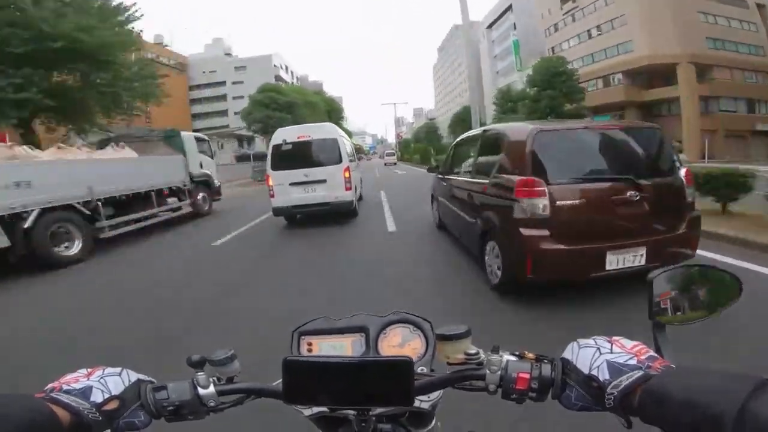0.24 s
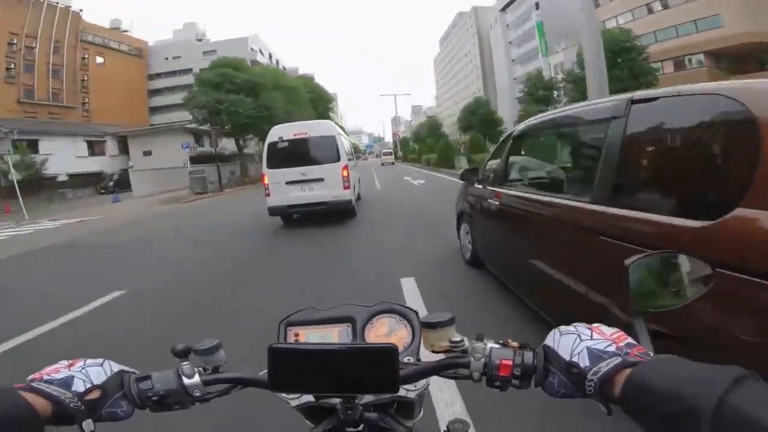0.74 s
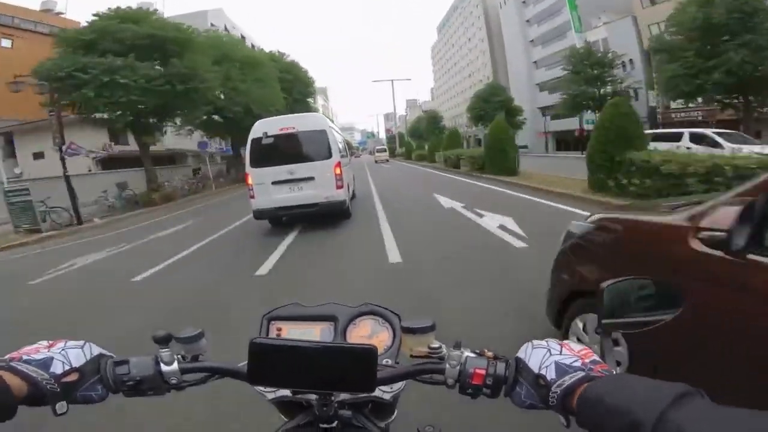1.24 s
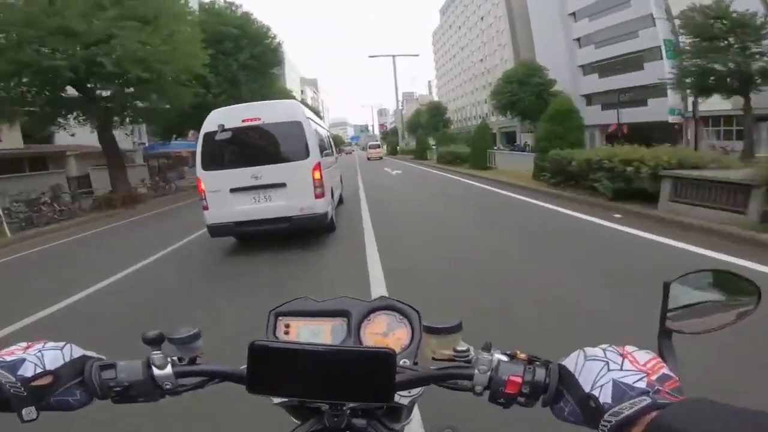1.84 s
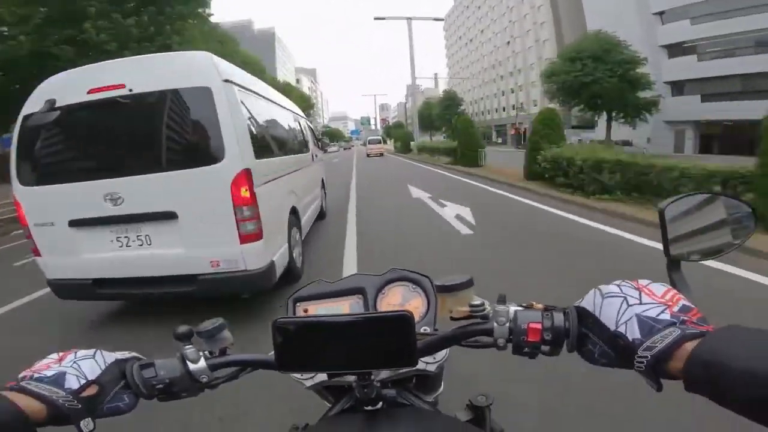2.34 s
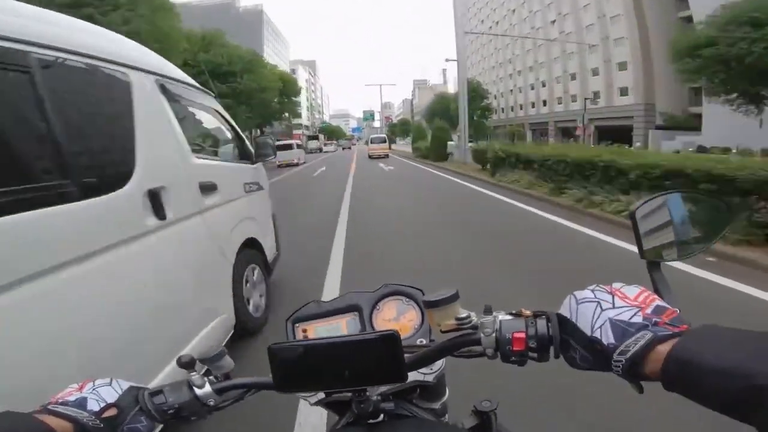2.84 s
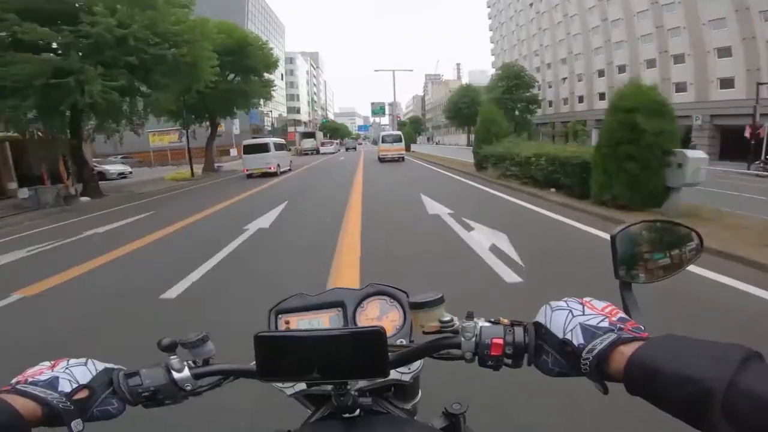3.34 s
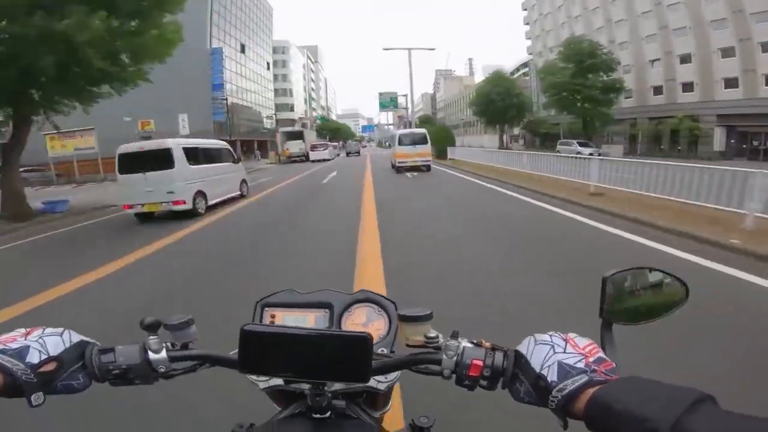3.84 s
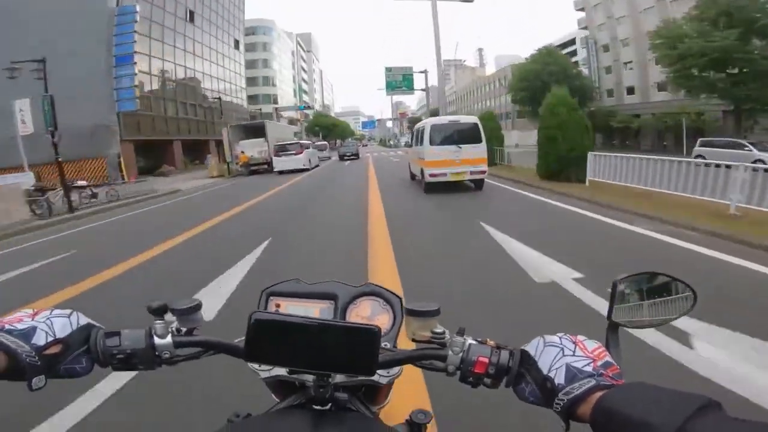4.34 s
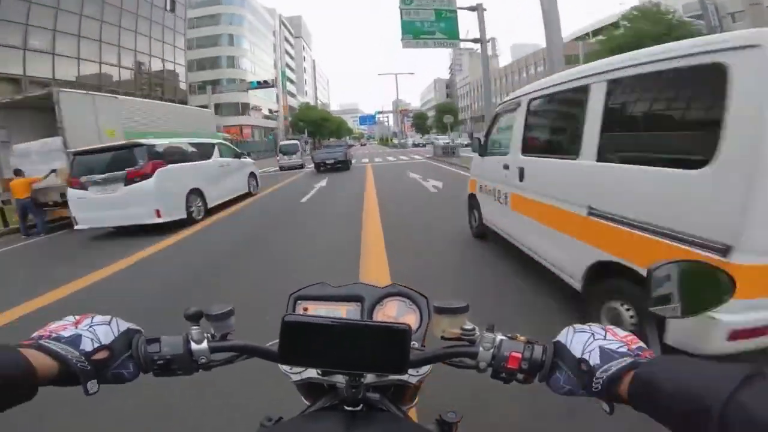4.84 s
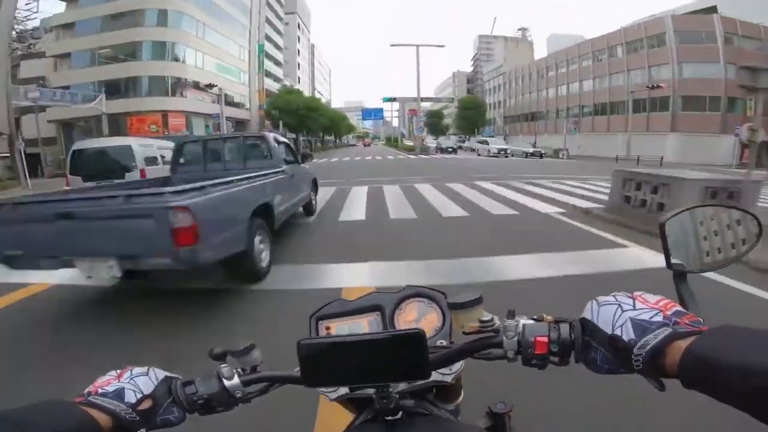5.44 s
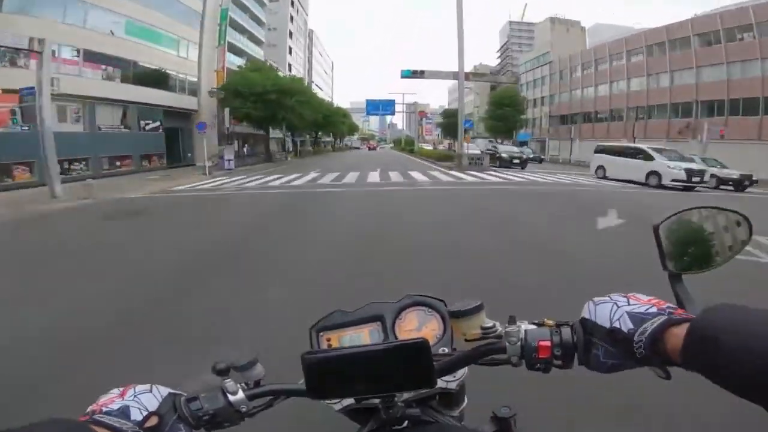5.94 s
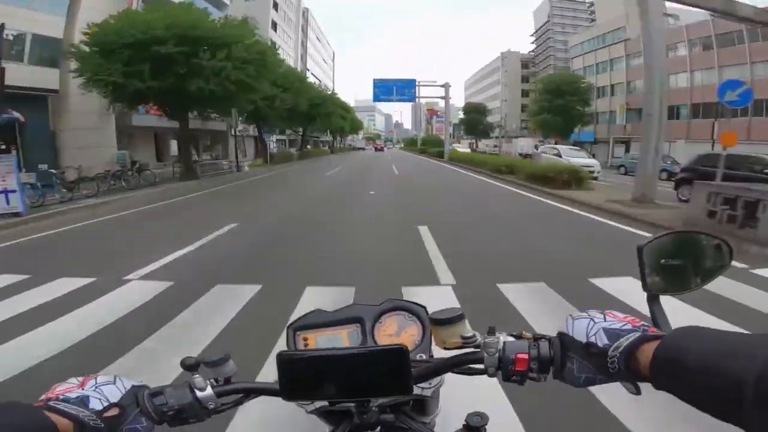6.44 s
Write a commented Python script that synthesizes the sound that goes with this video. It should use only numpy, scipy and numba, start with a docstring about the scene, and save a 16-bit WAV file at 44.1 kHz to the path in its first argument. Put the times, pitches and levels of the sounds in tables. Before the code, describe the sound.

An on-board stereo microphone on a motorcyclist riding through city traffic. At 0 s the V-twin is throttled down, rough and muted, then settles into a low uneven purr while strong wind gusts thud, click and crackle on the right until about 1 s. Wind eases somewhat around 1.3-2.7 s. From 1.8 s the engine pulls, its deep exhaust and hard bark rising until 2.65 s, when the throttle snaps shut for an upshift and the pitch drops. Around 2.8-3.2 s a bright rush of hiss and ringing exhaust reflects off a passed van; gusts overload near 3.3 s. A second loaded pull climbs from about 3.8 to 4.85 s, followed by another quick shift and a heavy wind slap. The engine drones steadily, backs off from 5.7 s with pops and sputters, briefly opens near 6.4 s and eases again, amid buffeting wind.

```python
"""A V-twin motorcycle rides through town and changes up twice, heard from two microphone ports on the rider.
Two uneven firings a cycle ring the exhaust: a deep body, a bark above it and blurred gas noise.
Engine and road hiss lie over it as filtered noise, swelling mostly beside vehicles overtaken.
Wind buffets each port on its own as low resonant noise, hardest on the right, where it overloads the
recorder with clicks and crackle."""
import sys
import numpy as np
from scipy import signal
from scipy.fft import rfft, irfft
from scipy.io import wavfile
from scipy.ndimage import uniform_filter1d
from numba import njit

SR = 44100
rng = np.random.default_rng(int(sys.argv[2]) if len(sys.argv) > 2 else 0)


def waveform_to_disk(signal):
    """Save audio, clipped to [-1, 1], as 16-bit WAV at the path in sys.argv[1]."""
    frames = np.transpose(np.atleast_2d(signal))
    scaled = np.clip(frames, -1, 1) * 32767
    samples = np.round(scaled).astype(np.int16)
    wavfile.write(sys.argv[1], SR, samples)


N = 294147


def undb(db):
    """Gain of a level in dB."""
    return 10 ** (np.asarray(db) / 20)


def unit(x):
    """Scaled to rms 1."""
    return x / np.sqrt(np.mean(x ** 2))


def curves(table):
    """Columns of a table joined by straight lines in time."""
    s, *columns = np.transpose(table)
    return [np.interp(np.arange(N) / SR, s, column) for column in columns]


def spell(start, end, rise, fall):
    """0 to 1 and back: full from start to end, straight ramps outside."""
    t = np.arange(N) / SR
    return np.clip(np.minimum(1 + (t - start) / rise, 1 + (end - t) / fall), 0, 1)


def late(x, s):
    """Delayed by s seconds; a negative s moves it ahead."""
    return np.interp(np.arange(N) - s * SR, np.arange(N), x, left=0)


def sides(pan_db):
    """Gains of the left and right port; pan_db is left minus right."""
    return undb(np.array([[pan_db], [-pan_db]]) / 2)


def walk(rate):
    """Random levels held 1 / rate s and slewed twice; spread near 1."""
    hold = int(SR / rate)
    levels = np.repeat(rng.standard_normal(N // hold + 1), hold)
    return 1.33 * uniform_filter1d(uniform_filter1d(levels, hold), hold)[:N]


@njit
def svf(x, hz, width):
    """State-variable band-pass with a moving centre, gain 1 at the centre."""
    y, band, low = np.empty(len(x)), 0., 0.
    for i in range(len(x)):
        g, k = np.tan(np.pi * hz[i] / SR), width / hz[i]
        v = (band + g * (x[i] - low)) / (1 + g * (g + k))
        band, low, y[i] = 2 * v - band, low + 2 * g * v, k * v
    return y


def ring(x, modes, count=2, stretch=0.97):
    """Resonances in parallel at stretched centres, rms 1; applied twice they leave dark valleys."""
    out = 0
    for hz, width, db in modes:
        y = x
        for _ in range(count):
            y = svf(y, hz * stretch * np.ones(N), width * np.mean(stretch) * np.sqrt(count))
        out = out + undb(db) * y
    return unit(out)


def causal(x, spectrum, size=8192):
    """Filter with the given (Hz, dB) spectrum and the earliest possible response, from the folded cepstrum."""
    hz, db = np.transpose(spectrum)
    grid = np.maximum(np.arange(size // 2 + 1) * SR / size, 1)
    cepstrum = irfft(np.log(undb(np.interp(np.log(grid), np.log(hz), db))))
    cepstrum[1:size // 2] *= 2
    cepstrum[size // 2 + 1:] = 0
    response = irfft(np.exp(rfft(cepstrum)))[:size // 2]
    return signal.fftconvolve(x, response)[:N]


# Steady stream of air over the ports between gusts.
# Each row: time in seconds, left port level in dB, right port level in dB.
STEADY_WIND = [(0, -23, -11.5), (.3, -20, -16), (1.1, -23, -12.5), (1.5, -23.5, -18), (2.2, -21, -21.5),
               (2.55, -19, -24.5), (2.85, -23, -6), (3.3, -14, -13), (3.5, -25.5, -15), (3.8, -21.5, -10),
               (4.1, -18.5, -10.5), (4.9, -18, -7), (5.6, -17.5, -11), (6.1, -10.5, -7), (6.4, -20, -9.5),
               (6.67, -9.5, -21)]
# Gusts that hit the ports. Each row: time of the peak in seconds, left peak in dB, right peak in dB.
WIND_GUSTS = [(0.058, -21.5, -6), (0.272, -13.5, -7), (.41, -9.5, 3), (0.633, -10, -1.5),
              (0.741, -21, -25.5), (0.858, -13, 0.5), (.96, -14, -6), (1.05, -15, -8.5),
              (1.142, -13.5, -7.5), (1.22, -16.5, -9), (1.28, -19, -17), (1.424, -16.5, -13.5),
              (1.65, -27.5, -14.5), (1.929, -13.5, -22.5), (2.28, -18.5, -15.5), (2.841, -12.5, -7),
              (3.04, -6.5, 3), (3.268, -11, -1), (3.331, -7, 4.5), (3.549, -12, -7), (3.721, -13, -7),
              (3.91, -10.5, -3.5), (4.128, -17, -13), (4.292, -20, -5.5), (4.459, -11.5, -4.5),
              (4.699, -32, -14), (4.761, -19, -23), (4.948, -2.5, 2.5), (5.259, -9, -3), (5.461, -8, 2),
              (5.711, -9.5, 0), (5.858, -5.5, 2), (6.02, -16.5, -6), (6.289, -4, 3.5), (6.557, -8.5, -14)]
GUST_RISE_DB_S, GUST_FALL_DB_S = 171.5, 170


def gusting():
    """Wind level in dB at each port: gusts climb out of the steady stream and die back."""
    t = np.arange(N) / SR
    power = undb(curves(STEADY_WIND)) ** 2
    for s, *peak_db in WIND_GUSTS:
        away_db = np.where(t < s, GUST_RISE_DB_S * (s - t), GUST_FALL_DB_S * (t - s))
        power = power + (undb(peak_db)[:, None] * undb(-away_db)) ** 2
    return 10 * np.log10(power)


# Single hard eddies on the right port.
# Each row: centre in seconds, swing in dB before its fade, pitch in Hz.
WIND_SLAPS = [(0.351, 5, 91), (0.645, 4.5, 91), (0.781, -0.5, 84), (0.844, 6, 104), (.882, 1.5, 86.4),
              (3.315, 7, 104), (3.938, -4, 95), (4.931, 12, 93), (5.853, 8.5, 84), (5.897, 11.5, 102),
              (6.046, 10.5, 89), (6.247, 4.5, 74.6), (6.299, 4, 93.5), (6.372, 7, 94)]


def slaps():
    """A swing or two of pressure, steepest at the given moment."""
    out, t = np.zeros(N), np.arange(-1300, 1300) / SR
    for s, db, hz in WIND_SLAPS:
        start = int(s * SR) - len(t) // 2
        fade = np.exp(-(t * hz / 0.59) ** 2)
        out[start:start + len(t)] += undb(db) * np.sin(2 * np.pi * hz * t) * fade
    return out


# Clicks of the right channel overloading in the wind.
# Each row: start in seconds, level of the first click in dB before filtering.
OVERLOAD_CLICKS = [(0.347, -19), (.381, -23), (.4, -19), (0.427, -25), (.443, -25), (.478, -21),
                   (.596, -24), (.621, -21.5), (.646, -25), (.683, -27), (0.782, -24), (0.836, -20.5),
                   (.876, -17), (.935, -22), (3.278, -14), (3.313, -1), (3.421, -17), (3.635, -22),
                   (3.733, -26), (3.863, -21), (3.936, -16), (5.159, -26), (5.228, -16), (5.335, -16),
                   (5.83, -13)]
# Falling spectrum of a click. Each row: frequency in Hz, gain in dB.
CLICK_SPECTRUM = [(200, 10), (650, 28), (1200, 20), (2500, 6), (6000, -14), (12000, -40)]
CLUSTER_CLICKS, CLICK_GAP_S, CLICK_FADE_DB = 4, .005, 4  # clicks in a cluster, mean gap, mean loss per click
# overload crackle in the hardest gusts: highest rate, wind level of half that rate, size before filtering
CRACKLE_PER_S, CRACKLE_FROM_DB, CRACKLE_DB = 100, 1, -27


def overload_clicks(wind_db):
    """Clusters of overload clicks, either way; random crackle stands in for more in the hardest gusts."""
    s, db = np.transpose(OVERLOAD_CLICKS)
    gap, size = rng.random((len(OVERLOAD_CLICKS), 2, CLUSTER_CLICKS)).transpose(1, 0, 2)
    click = np.arange(CLUSTER_CLICKS)
    at = s[:, None] + CLICK_GAP_S * np.cumsum((.5 + gap) * (click > 0), axis=1)
    gain = undb(db[:, None] - 2 * CLICK_FADE_DB * click * size) * (-1.) ** click
    clusters = np.bincount((at.ravel() * SR).astype(int), gain.ravel(), N)
    chance = CRACKLE_PER_S / SR / (1 + undb(2 * (CRACKLE_FROM_DB - wind_db)) ** 2)
    crackling = rng.random(N) < chance
    crackle = undb(CRACKLE_DB) * crackling * rng.standard_normal(N)
    return causal(clusters + crackle, CLICK_SPECTRUM)


WIND_FLOOR_HZ, WIND_TOP_HZ = 17, 530


def wind():
    """Eddies thud on each port: a broad low resonance over a deep heave, with a tail into the low mids."""
    floor = signal.butter(2, WIND_FLOOR_HZ, "high", fs=SR, output="sos")
    top = signal.butter(3, WIND_TOP_HZ, fs=SR, output="sos")
    edges = np.vstack((floor, top))
    left_db, right_db = gusting()
    out = []
    for db, heave_db, flutter_db in ((left_db, -4.5, -10), (right_db, -2.2, -19)):
        gust = undb(4.3 * walk(15))
        hz = 60.5 + 0.71 * (db + 5.0)  # faster air sheds quicker eddies
        thud = unit(svf(svf(gust * rng.standard_normal(N), hz, 43.0), hz, 110.))
        heave = ring(gust * rng.standard_normal(N), [(35.4, 23.7, 0)])
        flutter = ring(gust * rng.standard_normal(N), [(111.0, 160, -3.0), (281.0, 89.0, -6.0)])
        rumble = thud + undb(heave_db) * heave + undb(flutter_db) * flutter
        out.append(undb(db) * signal.sosfilt(edges, rumble))
    left, right = out
    return np.array([left, right + slaps() + overload_clicks(right_db)])


# The hiss swells, mostly beside vehicles overtaken. Each row: start of the full swell in seconds,
# its end in seconds, rise before it in seconds, rasp gain in dB, air gain in dB.
HISS_SWELLS = [(0.442, 0.896, 0.12, 0.5, 2.5), (2.284, 2.33, 0.28, 2.5, 1.5),
               (2.759, 3.21, 0.06, 9.5, 15.5), (4.388, 4.444, 0.16, 2, 4), (4.982, 5.246, 0.13, 3.5, 6),
               (5.608, 5.72, 0.051, 3.5, 9), (5.86, 5.882, 0.038, -2.5, -3.5), (6.32, 6.33, 0.12, 2, 0.5)]
SWELL_FALL_S = 0.31


def swells():
    """Gain of rasp and of air in dB."""
    shape = np.array([spell(start, end, rise, SWELL_FALL_S) for start, end, rise, _, _ in HISS_SWELLS])
    return np.transpose(HISS_SWELLS)[3:] @ shape


# Spectrum of the rasp from engine and road. Each row: frequency in Hz, level in dB.
RASP_SPECTRUM = [(200, -11), (400, 11.5), (850, 9.5), (1100, 3), (1350, -3), (1900, -6.5), (2350, -13),
                 (2750, -7), (3300, -16), (3800, -18), (4300, -20.5), (5500, -29), (9000, -60.5)]
# Spectrum of the airy hiss above it. Each row: frequency in Hz, level in dB.
AIR_SPECTRUM = [(1500, -34), (3500, 3.5), (5000, 2.5), (6000, 1.5), (7000, -5.5), (8500, -10), (10000, -14),
                (12000, -20.5), (15000, -31)]
# Valve gear rings the engine case. Each row: centre in Hz before the stretch in ring(), width in Hz
# before the same stretch, level in dB.
CLATTER_MODES = [(2722, 160, -0.5), (3350, 500, -4.5), (2038, 90, 2.5)]
CLATTER_DB, CLATTER_S = -20, 0.013  # under the rasp; decay after each firing
AIR_PAN_DB = -1  # left minus right


def hiss(since, rasp_db, air_db):
    """Rasp and clatter that jump at each firing and air above it, flickering, partly shared by the ports."""
    jump = 1 + .9 * np.exp(-since / .006)
    clatter_jump = 0.95 + np.exp(-since / CLATTER_S)
    shared, left, right, case = rng.standard_normal((4, N))
    flicker_db = 1.0 * walk(25)
    out = []
    for own, pan_db in ((left, AIR_PAN_DB / 2), (right, -AIR_PAN_DB / 2)):
        noise = .65 * shared + own
        rasp = undb(rasp_db) * unit(causal(jump * noise, RASP_SPECTRUM))
        case_noise = 0.53 * case + rng.standard_normal(N)
        clatter = undb(rasp_db + CLATTER_DB) * ring(clatter_jump * case_noise, CLATTER_MODES)
        air = undb(air_db + pan_db) * unit(causal(noise, AIR_SPECTRUM))
        out.append(undb(flicker_db) * (rasp + clatter + air))
    return np.array(out)


BARK_AHEAD_S = .0012  # bark pulses moved ahead, since the doubled resonance rises slowly

# Firings ring between bike and vehicle. Each row: centre in Hz before the stretch in ring(), width in Hz
# before the same stretch, level in dB.
FLANK_MODES = [(655, 80, 2.5), (887, 12, 2)]
FLANK_DB, FLANK_GAIN = -56, 2.9  # with no swell and no exhaust drop; dB per dB of rasp swell
FLANK_FIRST_DB, FLANK_ECHO_S, FLANK_ECHO_DB = -18, .0066, -9  # first firing beside the second; one echo


def flank(pulses, rasp_swell_db, drop_db):
    """Vehicle flanks throw the firings back, mainly the second, as a ring with one echo."""
    beside = late(undb(FLANK_FIRST_DB) * pulses[0] + pulses[1], -BARK_AHEAD_S)
    echoed = beside + undb(FLANK_ECHO_DB) * late(beside, FLANK_ECHO_S)
    return undb(FLANK_DB + FLANK_GAIN * rasp_swell_db - drop_db) * ring(echoed, FLANK_MODES)


# The engine through two pulls in a gear, each ended by a change up.
# Each row: time in seconds, engine cycle rate in Hz, load from 0 to 1.
ENGINE_RUN = [(0.0, 39.15, 0.2), (0.24, 39.2, 0), (0.32, 40.72, 0.1), (0.42, 39.3, 0.01), (.85, 39.65, .1),
              (1.25, 40.5, .25), (1.42, 40.7, 0.3), (1.74, 41.07, 0.2), (1.81, 41.52, 0.7),
              (2.05, 43.9, 0.8), (2.2, 45.7, .85), (2.35, 47.2, 0.9), (2.5, 48.75, .95), (2.62, 49.7, 0.97),
              (2.75, 38.1, 0), (2.8, 40.2, .25), (3.05, 41.4, 0.4), (3.35, 42.08, 0.2), (3.6, 41.68, .35),
              (3.78, 42.43, 0.6), (4.0, 43.35, 1), (4.25, 44.8, .97), (4.5, 46.3, .94), (4.82, 47.8, 0.9),
              (4.94, 38.1, 0.1), (4.99, 40.0, 0.4), (5.16, 40.7, 0.3), (5.66, 40.5, 0.6), (5.92, 39.08, .4),
              (6.25, 39.44, .4), (6.36, 40.3, 0.4), (6.45, 43.1, 0.2), (6.67, 44.47, .3)]


def engine_run():
    """Engine cycle rate in Hz and load, moving in straight lines."""
    return curves(ENGINE_RUN)


# Throttle shut or feathered. Each row: start in seconds, end in seconds, exhaust drop in dB,
# unevenness of the burn from 0 to 1.
THROTTLE_SHUT = [(-.1, 0.209, 10, 0.5), (2.649, 2.733, 8.5, 0.1), (4.847, 4.933, 12.5, 0),
                 (5.068, 5.657, 0.15, 0.09), (5.705, 5.922, 10.5, 0.4), (5.916, 6.205, 8.5, 0.1),
                 (6.183, 6.365, 10, 0.4), (6.364, 6.465, 0.5, .25), (6.494, 6.8, 8.5, 0.3)]
# The exhaust catches for a moment. Each row: start in seconds, rise in dB.
EXHAUST_CATCHES = [(.045, 6), (0.117, 0.5), (4.99, 3.5), (5.772, 6), (5.838, 13.5), (6.309, 5), (6.43, 2.5),
                   (6.6, 4)]
CLOSE_S, OPEN_S = 0.032, 0.056  # the throttle snaps shut and rolls open
CATCH_S, STEADY_BURN = .018, .05  # length of a catch and of each ramp; least unevenness


def throttle():
    """Drop of the exhaust level in dB and unevenness of the burn."""
    shut = np.array([spell(start, end, CLOSE_S, OPEN_S) for start, end, _, _ in THROTTLE_SHUT])
    shut = shut / np.maximum(shut.sum(axis=0), 1)  # overlapping spells share the throttle
    drop_db, rough = np.transpose(THROTTLE_SHUT)[2:] @ shut
    for s, db in EXHAUST_CATCHES:
        drop_db = drop_db - db * spell(s, s + CATCH_S, CATCH_S, CATCH_S)
    return drop_db, np.maximum(rough, STEADY_BURN)


# Uneven spacing of the twin, the second firing drifting later through each pull.
# Each row: time in seconds, place of the second firing as a share of the cycle.
SECOND_FIRING_PLACE = [(0, 0.4), (1.7, 0.38), (1.85, 0.37), (2.6, 0.41), (2.68, 0.38), (2.8, 0.39),
                       (3.3, 0.39), (3.5, 0.37), (3.9, 0.389), (4.8, 0.41), (4.88, 0.37), (5.7, 0.39),
                       (6.67, 0.37)]
FIRST_TURN = .463  # cycles before the first firing


def firings(hz, rough):
    """Two pulses a cycle, scattered by a rough burn; one train per cylinder, and seconds since the last."""
    cycles = np.cumsum(hz) / SR - FIRST_TURN
    turns = np.arange(int(cycles[-1]))
    gap = np.interp(turns, cycles, curves(SECOND_FIRING_PLACE)[0])
    place = np.interp(np.sort(np.r_[turns, turns + gap]), cycles, np.arange(N))
    chance = rng.standard_normal((len(place), 2))
    scatter = np.interp(place, np.arange(N), rough)
    place = np.clip(place + scatter * chance[:, 0] * .0012 * SR, 0, N - 2)
    size = undb(8 * scatter * chance[:, 1])
    # each pulse is split over the two samples around its place
    whole = place.astype(int)
    share = place - whole
    early_part, late_part = size * (1 - share), size * share
    pulses = np.array([np.bincount(whole[k::2], early_part[k::2], N) +
                       np.bincount(whole[k::2] + 1, late_part[k::2], N) for k in range(2)])
    fired = pulses.sum(axis=0) > 0
    since = np.arange(N) - np.maximum.accumulate(np.where(fired, np.arange(N), 0))
    return -pulses, since / SR


EXHAUST_DB = -16.5  # level of the body with the throttle open

# The note left with the throttle shut.
# Each row: centre as a multiple of the cycle rate, width in multiples of the mean rate, level in dB.
OVERRUN_MODES = [(8, .8, 0)]
OVERRUN_DB, OVERRUN_FULL_DB = -13, 7  # under the open body; exhaust drop at which it sounds in full


def overrun(pulses, drop_db, hz):
    """A narrow resonance follows a multiple of the cycle rate while the exhaust is down."""
    depth = np.clip(drop_db / OVERRUN_FULL_DB, 0, 1)
    return undb(EXHAUST_DB + OVERRUN_DB) * depth * ring(pulses.sum(axis=0), OVERRUN_MODES, stretch=hz)


# Spectra of one exhaust pulse at light and at full load. Each row: frequency in Hz, level in dB.
LIGHT_PULSE = [(30, -28.5), (90, -6.5), (160, -28.5), (203, -2.5), (240, 0.5), (290, -6), (330, -3),
               (400, 4.5), (450, 2), (490, -12.5), (530, -11), (580, -26), (800, -44), (2500, -120)]
LOADED_PULSE = [(30, -23), (90, 1.5), (140, -2.5), (185, -5), (232, 2.5), (280, -5), (320, -5), (370, -2.5),
                (455, 4.5), (505, -4), (550, -14.5), (600, -23.5), (800, -25), (2500, -120)]
# Upper pipe resonances; they climb with the revs as the gas heats.
# Each row: centre in Hz at a cycle rate of BARK_AT_HZ, width in Hz at that rate, level in dB.
BARK_MODES = [(667, 80, 12), (736.4, 65.6, 16), (795, 41, 7)]
BARK_AT_HZ, BARK_CLIMB = 43.3, .3  # cycle rate; power of the rev ratio that they follow
BARK_LIGHT_DB, BARK_LOAD_DB = -21.5, 8  # over the body at no load; added at full load
BARK_KEEP, BARK_BESIDE = .3, 0.67  # share of an exhaust drop escaped; dB per dB of rasp swell off flanks
# under load the second firing barks harder, less so as the revs climb
BARK_SECOND_DB, BARK_EVENS_DB_HZ, BARK_EVENS_FROM_HZ = 10, 1.2, 41.5
ECHO_S, ECHO_DB, ECHO_LOAD_DB = 0.00621, -17.5, 10  # the bark returns once down the pipe, more under load
BARK_PAN_DB = -3  # left minus right
# A thin top note at light load, then gas noise in the pipe, low and under the bark. Each row: centre in Hz
# before the stretch in ring(), width in Hz before the same stretch, level in dB.
LIGHT_RING_MODES = [(856, 36, 0)]
GAS_MODES = [(260, 11, -17.5), (460.5, 25, -3)]
GAS_BARK_MODES = [(684, 43, 5.1), (822, 170, 1)]
LIGHT_RING_DB, GAS_DB = -24, -19.5  # under the body
GAS_BARK_DB, GAS_BARK_LOAD_DB = -6, -12  # under the bark at no load; added at full load, cleaner


def exhaust(pulses, since, level_db, bark_db, load, hz):
    """Firings ring the pipe, deeper under load; turbulent gas blurs the lines differently at each port."""
    first, second = pulses
    both = first + second
    body = unit(causal((1 - load) * both, LIGHT_PULSE) + causal(load * both, LOADED_PULSE))

    second_db = load * (BARK_SECOND_DB - BARK_EVENS_DB_HZ * (hz - BARK_EVENS_FROM_HZ))
    blows = late(first + undb(second_db) * second, -BARK_AHEAD_S)
    echoed = blows + undb(ECHO_DB + ECHO_LOAD_DB * load) * late(blows, ECHO_S)
    bark = undb(bark_db) * ring(echoed, BARK_MODES, stretch=(hz / BARK_AT_HZ) ** BARK_CLIMB)
    bark = bark + undb(LIGHT_RING_DB) * (1 - load) * ring(both, LIGHT_RING_MODES)

    puff = 1.2 + np.exp(-since / 0.023)
    shared, left, right = puff * rng.standard_normal((3, N))
    gas_bark = undb(bark_db + GAS_BARK_DB + GAS_BARK_LOAD_DB * load)
    gas = [undb(GAS_DB) * ring(noise, GAS_MODES) + gas_bark * ring(noise, GAS_BARK_MODES)
           for noise in (7.9 * shared + left, 1.1 * shared + right)]
    return undb(level_db) * (body + sides(BARK_PAN_DB) * bark + np.array(gas))


RASP_DB, RASP_LOAD_DB, AIR_DB, AIR_LOAD_DB = -40.5, 7.5, -65, 7.5  # hiss at no load; added at full load
HISS_DROP = 0.058  # share of an exhaust drop that rasp and clatter follow


def scene():
    """Engine, hiss and wind at the two ports."""
    hz, load = engine_run()
    drop_db, rough = throttle()
    rasp_swell_db, air_swell_db = swells()
    pulses, since = firings(hz, rough)

    bark_db = BARK_LIGHT_DB + BARK_LOAD_DB * load + BARK_KEEP * drop_db + BARK_BESIDE * rasp_swell_db
    engine = exhaust(pulses, since, EXHAUST_DB - drop_db, bark_db, load, hz)
    engine = engine + flank(pulses, rasp_swell_db, drop_db)
    engine = engine - overrun(pulses, drop_db, hz)  # in opposite polarity

    rasp_db = RASP_DB + RASP_LOAD_DB * load + rasp_swell_db - HISS_DROP * drop_db
    air_db = AIR_DB + AIR_LOAD_DB * load + air_swell_db
    return engine + hiss(since, rasp_db, air_db) + wind()


CUT_HZ, TOP_HZ = 15600, 20500  # low-pass edges before and after the overload
KNEE = 60  # the higher, the harder the overload


def record(dry):
    """The recorder cuts the top, then gusts hit full scale and flatten over a short knee."""
    cut = signal.sosfilt(signal.ellip(8, .2, 70, CUT_HZ, fs=SR, output="sos"), dry)
    flat = cut / (1 + np.abs(cut) ** KNEE) ** (1 / KNEE)
    return signal.sosfilt(signal.ellip(8, .05, 70, TOP_HZ, fs=SR, output="sos"), .997 * flat)


dry = scene()
out = record(dry)
waveform_to_disk(out)
```